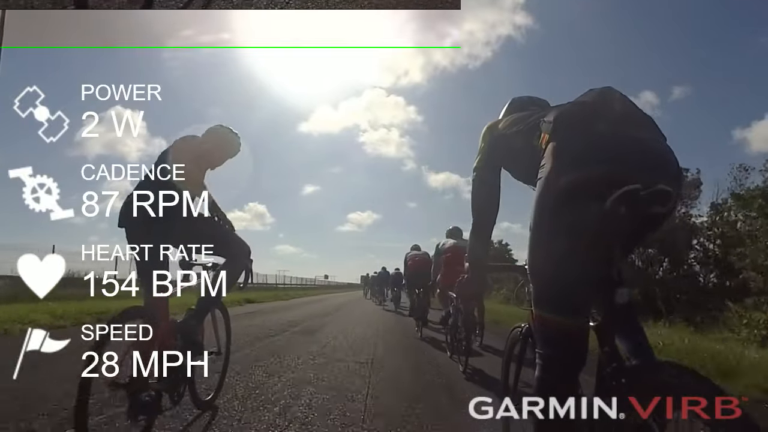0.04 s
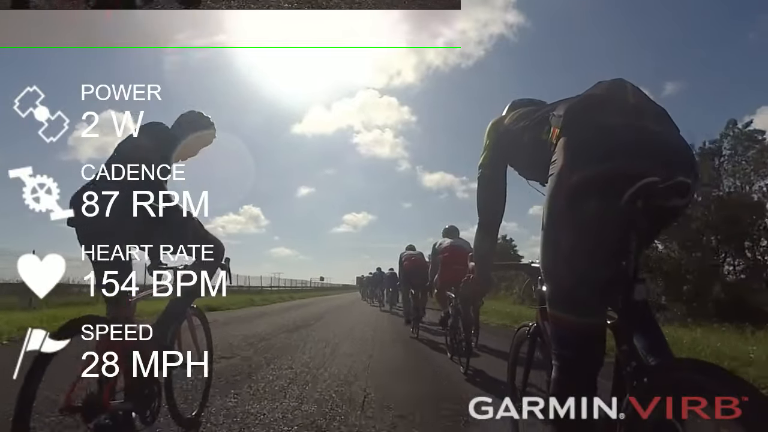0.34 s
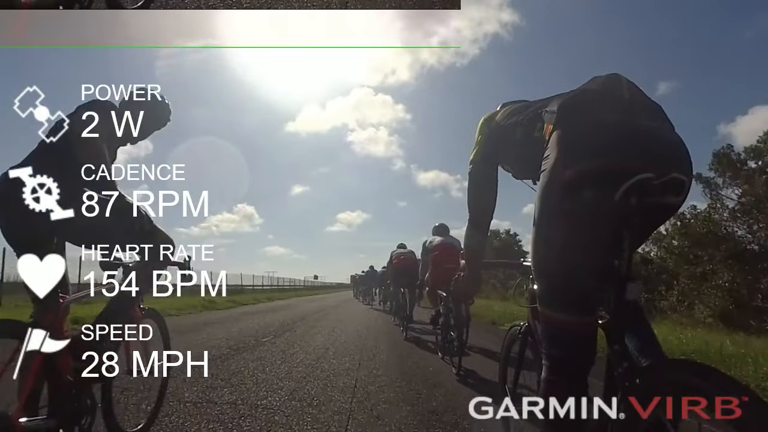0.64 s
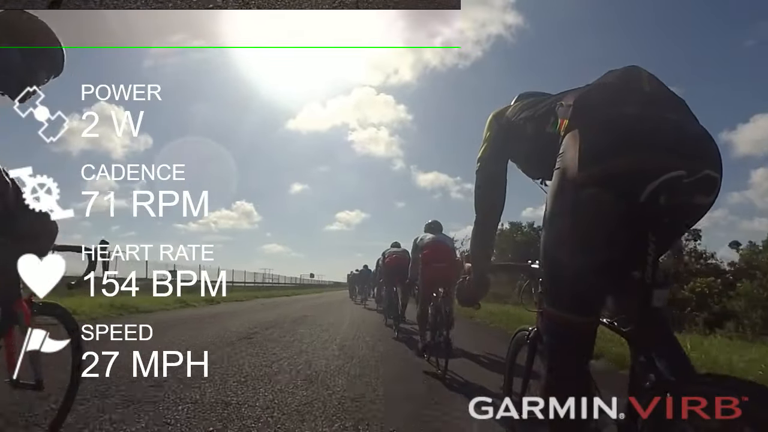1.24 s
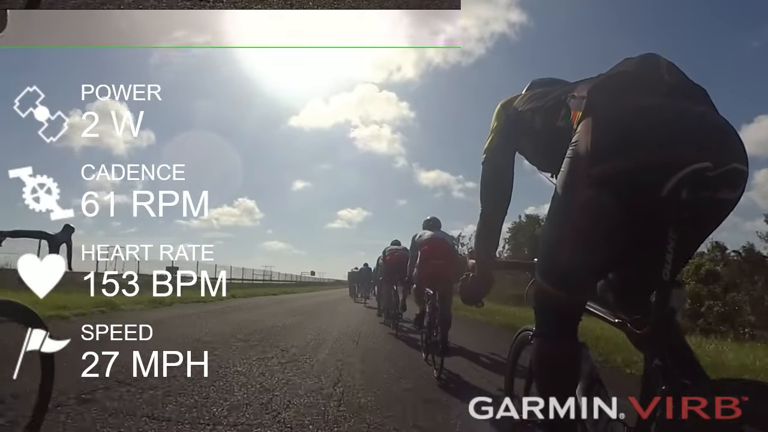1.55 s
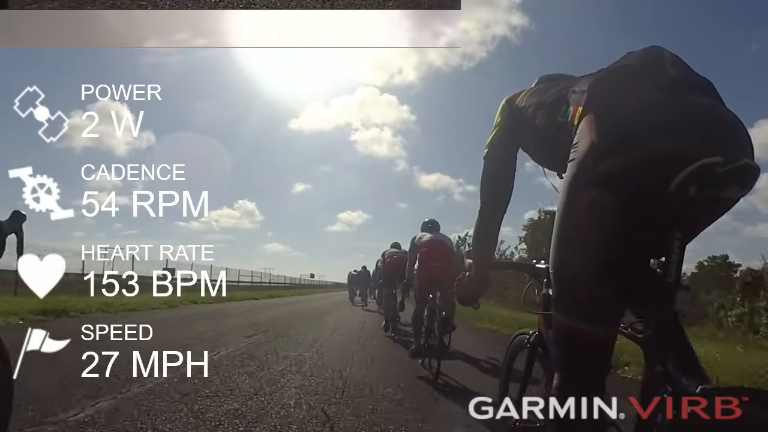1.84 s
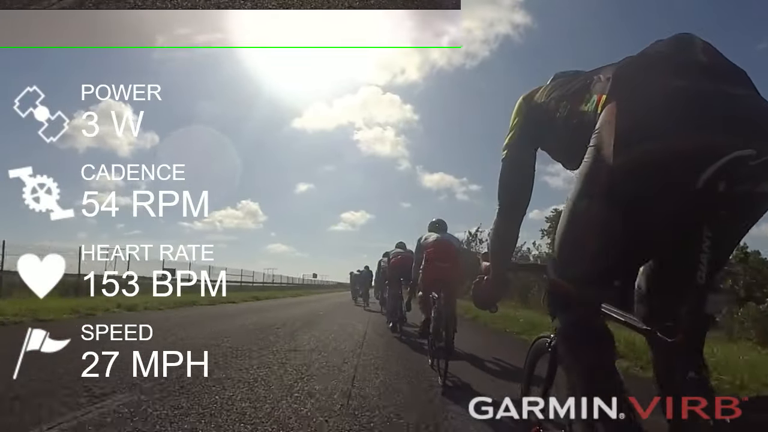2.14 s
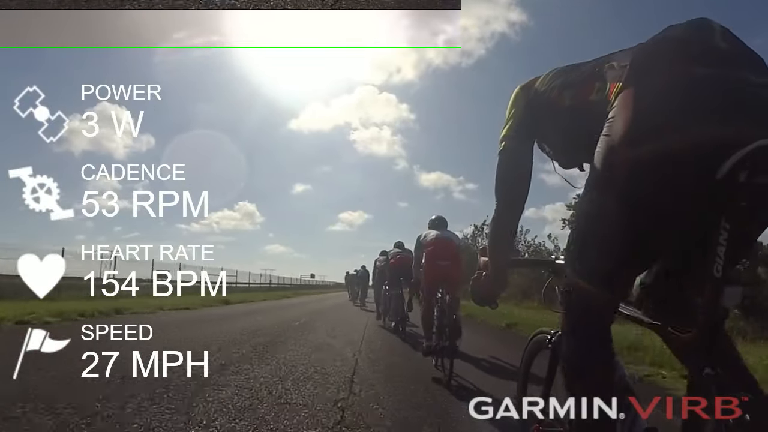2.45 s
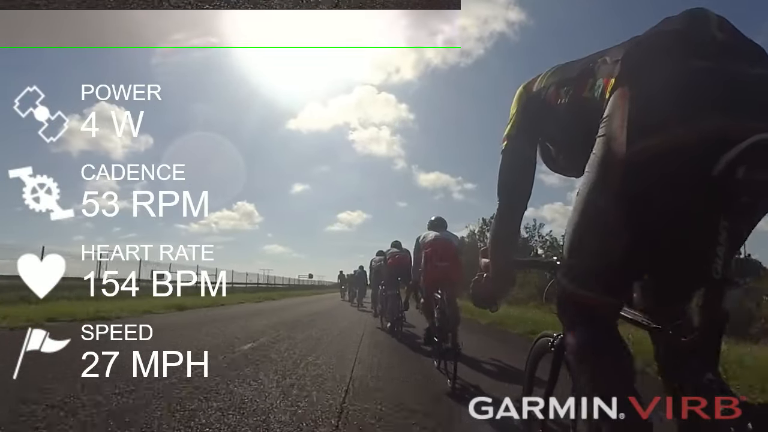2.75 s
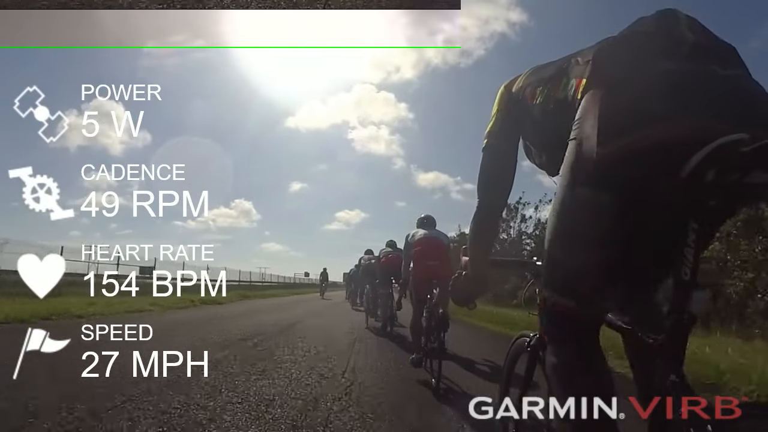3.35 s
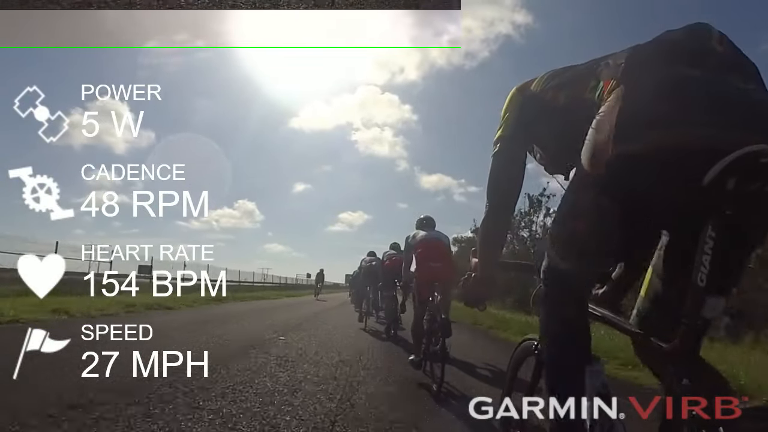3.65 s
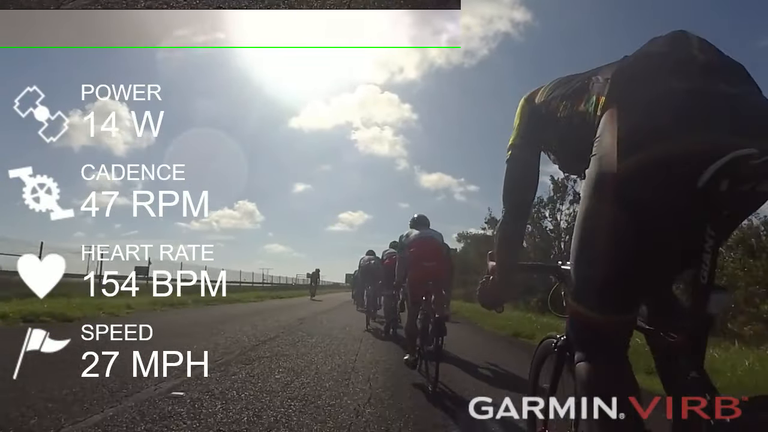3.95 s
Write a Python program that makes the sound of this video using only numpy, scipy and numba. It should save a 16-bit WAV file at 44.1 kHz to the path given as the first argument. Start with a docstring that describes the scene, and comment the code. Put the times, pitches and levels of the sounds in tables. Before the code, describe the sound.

Wind rumbles on the microphone over tyre noise from racing bicycles and a buzzing freewheel.

```python
"""A small camera in a case rides on a racing bicycle, in a fast bunch on coarse asphalt. From the start, wind
rumbles, road grit rings the case and the coasting freewheel buzzes. Gusts boom and thump on the case, bumps
knock the mount and light clicks rattle the case. Near 1.3 s the tyres hum. The freewheel slows to single ticks
and stops just after 2 s as the pedals catch up. Then the chain chatters in short spells, while the next rider's
tyres hiss closer and fade away."""
import sys
import numpy as np
from scipy import signal
from scipy.fft import rfft, irfft, next_fast_len
from scipy.io import wavfile
from scipy.ndimage import uniform_filter1d
from numba import njit

SR = 44100
rng = np.random.default_rng(int(sys.argv[2]) if len(sys.argv) > 2 else 0)


def to_wav(sig):
    """Store sig (one row per channel, or 1-D mono) as 16-bit WAV at the path in sys.argv[1].

    Samples outside -1..1 are clipped; the rate is SR.
    """
    pcm = np.clip(np.atleast_2d(sig), -1, 1) * 32767
    pcm = np.round(pcm).astype(np.int16)
    wavfile.write(sys.argv[1], SR, pcm.T)  # frames by channels


N = 176400
T = np.arange(N) / SR

# Levels in a table are relative: a function may turn its whole sound up or down.
# How loud the wind rumbles: time_s, level_db
WIND_LEVELS = [(0.0, -26), (0.08, -39.5), (0.1, -40.5), (0.22, -33), (0.24, -36.5), (0.51, -35.5),
               (0.54, -45), (0.63, -33.5), (0.67, -40.5), (0.76, -27), (0.78, -39.5), (0.89, -37),
               (0.91, -40.5), (1.06, -32), (1.48, -33.5), (1.49, -52), (1.53, -30.5), (1.7, -39.5),
               (1.8, -30.5), (1.87, -38), (1.93, -36), (2.51, -32), (2.53, -46), (2.56, -39), (2.6, -44),
               (2.66, -31), (2.86, -37), (2.88, -31), (3.25, -34), (3.36, -35), (3.42, -44.5),
               (3.44, -42.5), (3.48, -33.5), (3.77, -33), (3.79, -45), (3.83, -32.5), (4.0, -40.5)]
# Tone of the wind: pitch_hz, level_db
WIND_TONE = [(15, -31), (29, -21), (41, 1), (49, -0.5), (58, 2), (72, -7.5), (95, -8), (116, -3),
             (145, -24), (260, -38), (600, -80)]
# How loud the road and wind roar: time_s, level_db
ROAR_LEVELS = [(0.0, -43), (0.03, -45), (0.11, -56.5), (0.15, -48), (0.18, -51), (0.22, -55), (0.26, -62.5),
               (0.3, -49.5), (0.56, -59.5), (0.63, -53.5), (0.66, -58), (0.74, -47), (0.78, -57),
               (0.87, -50.5), (0.895, -66.5), (0.97, -51.5), (0.99, -56.5), (1.05, -48.5), (1.29, -50.5),
               (1.35, -46.5), (1.4, -49.5), (1.46, -47.5), (1.5, -58), (1.53, -48), (1.57, -58.5),
               (1.59, -50.5), (1.63, -59.5), (1.75, -49.5), (1.78, -44.5), (1.85, -53.5), (1.92, -44),
               (1.93, -46.5), (2.03, -52), (2.15, -46), (2.21, -52), (2.31, -46.5), (2.54, -49),
               (2.56, -39), (2.58, -56.5), (2.65, -45), (2.75, -50.5), (2.88, -44), (2.97, -49.5),
               (3.24, -44), (3.38, -57.5), (3.405, -48), (3.43, -57.5), (3.46, -50.5), (3.64, -45.5),
               (3.66, -53.5), (3.81, -50), (3.83, -45), (3.85, -55.5), (4.0, -53.5)]
# Tone of the roar: pitch_hz, level_db
ROAR_TONE = [(90, -18.5), (160, 3.5), (212, 6.5), (262, -11.5), (322, 3.5), (395, -9), (505, 0.5),
             (620, -4), (740, -13), (900, -13), (1020, -22), (1150, -17.5), (1280, -23), (1500, -20.5),
             (1850, -24), (2100, -33.5), (2900, -39.5), (3800, -39.5), (4750, -52.5), (5600, -60.5),
             (7200, -84), (8000, -52), (10500, -64.5)]
# How fast the freewheel ticks: time_s, ticks_per_s
TICK_RATES = [(0, 170), (1.0, 139), (1.42, 164), (1.57, 145), (1.7, 102), (1.89, 74), (1.99, 56),
              (2.08, 49), (2.09, 28), (2.115, 26)]
# How loud the freewheel is: time_s, level_db
TICK_LEVELS = [(0, -60), (.07, -68), (.085, -74.5), (.18, -70), (.25, -79.5), (.43, -71.5), (.54, -82),
               (.62, -73.5), (.87, -70.5), (.91, -84), (1.05, -67.5), (1.46, -68), (1.5, -74.5),
               (1.65, -78.5), (1.76, -68), (1.84, -75), (1.91, -68), (2.01, -76), (2.06, -67.5),
               (2.13, -72), (2.15, -110)]
# Tone of the wheel hub: pitch_hz, level_db
HUB_TONE = [(1200, -5.5), (2000, 1.5), (3000, -2.5), (3500, 13), (3850, 18.5), (4400, 1.5), (5100, 0.5),
            (5650, -2.5), (6400, -8.5), (7200, -14.5), (7950, 3.5), (8700, -1.5), (9800, -10), (11200, -21),
            (14000, -19.5)]
# Gusts that make the case boom: middle_s, level_db
BOOM_GUSTS = [(0.055, -48), (0.87, -51.5), (1.07, -41.5), (1.93, -42), (2.32, -43), (2.448, -43.5)]
# Low notes of the case: pitch_hz, width_hz, level_db
BOOM_NOTES = [(195, 52, -1), (318, 97, -6)]
# Slaps of wind on the case: time_s, thump_db, crunch_db
WIND_SLAPS = [(0.07, -13, -39), (0.149, -18, -47), (0.222, -18, -40.5), (0.379, -18.5, -42.5),
              (0.446, -21.5, -43), (0.505, -21, -44.5), (0.641, -15, -41), (0.828, -19.5, -43.5),
              (0.879, -16, -39), (1.269, -17, -44), (1.462, -22.5, -40.5), (1.53, -23, -47),
              (1.596, -21, -48), (1.778, -22, -49), (1.918, -17, -57), (1.981, -17.5, -39),
              (2.061, -24.5, -41), (2.153, -25, -49), (2.194, -20.5, -40.5), (2.326, -22, -42.5),
              (2.555, -14.5, -52.5), (2.877, -26.5, -39), (3.254, -16.5, -38.5), (3.411, -16.5, -45.5),
              (3.833, -13.5, -42), (3.975, -23.5, -46.5)]
# Tone of a slap's crunch: pitch_hz, level_db
CRUNCH_TONE = [(150, 8.5), (500, 5.5), (900, -5), (1750, -23), (2300, -25.5), (3300, -30), (3850, -11.5),
               (4500, -30.5), (6800, -50.5), (8200, -40), (10000, -56)]
# Hard bumps in the road: start_s, level_db
ROAD_BUMPS = [(0.073, -47.5), (0.6406, -44), (0.8815, -50), (2.558, -58.5)]
# Notes of the knocked mount: pitch_hz, level_db, ring_s (time to fade by 60 dB)
MOUNT_NOTES = [(1624, -2.5, 0.017), (2600, -15.5, 0.014), (4000, -15, 0.019)]
# Light clicks and taps that rattle the case: start_s, level_db
RATTLE_CLICKS = [(0.0745, -55), (0.1512, -53.5), (0.5126, -59), (0.522, -63), (0.882, -55), (1.6015, -60),
                 (1.6108, -57.5), (1.9817, -63), (3.035, -59), (3.5379, -58.5), (3.685, -57), (3.734, -57),
                 (3.7554, -55.5), (3.867, -76), (3.9075, -66.5), (3.9205, -59.5), (3.9334, -66), (3.963, -63),
                 (3.9914, -66)]
# Tone of a tap's scuff: pitch_hz, level_db
SCUFF_TONE = [(300, -10), (1500, 1), (2600, -6), (4000, 0), (5200, -7), (6500, -22)]
# Swells of tyre hum: middle_s, length_s, level_db
TYRE_SWELLS = [(1.3, 0.3, -55.5), (2.351, 0.36, -58.5), (3.214, 0.077, -45)]
# Spells of chain chatter: middle_s, length_s, level_db
CHATTER_SPELLS = [(2.286, 0.055, -68), (2.379, 0.044, -71), (2.89, 0.031, -68), (3.244, 0.032, -71),
                  (3.547, 0.033, -67.5), (3.61, .08, -74.5)]
# Tone of the chain: pitch_hz, level_db
CHAIN_TONE = [(2000, -21), (3400, 0), (4250, 4), (4800, -6.5), (5500, -19.5), (7000, -35)]


def from_db(db):
    """Turn decibels into a number to multiply by."""
    return 10 ** (np.asarray(db) / 20)


def normalise(x):
    """Scale a sound to an average power of 1."""
    return x / np.sqrt(np.mean(x ** 2))


def gain_curve(rows):
    """Gain that slides between (time_s, level_db) rows."""
    return from_db(np.interp(T, *np.array(rows).T))


def swell(middle_s, length_s, level_db, steepness=2):
    """A smooth rise and fall; more steepness gives a flatter top."""
    return from_db(level_db) * np.exp(-(2 * (T - middle_s) / length_s) ** steepness)


def flutter(rate_hz, depth_db):
    """Gain that wavers smoothly at random."""
    hold = int(SR / rate_hz)
    steps = np.repeat(rng.standard_normal(N // hold + 1), hold)
    return from_db(depth_db * normalise(uniform_filter1d(steps, hold)[:N]))


def shape_tone(x, rows):
    """Filter a sound along a curve of (pitch_hz, level_db) rows."""
    size = next_fast_len(N + SR // 2)
    hz, db = np.array(rows).T
    bins_hz = np.maximum(np.arange(size // 2 + 1) * SR / size, 1)
    rolloff = np.minimum(1, hz[-1] / bins_hz) ** 2
    gains = rolloff * from_db(np.interp(np.log(bins_hz), np.log(hz), db))
    # fold the filter so it rings after each click, never before
    cepstrum = irfft(np.log(gains), size)
    cepstrum[1:size // 2] *= 2
    cepstrum[size // 2 + 1:] = 0
    return irfft(rfft(x, size) * np.exp(rfft(cepstrum)), size)[:N]


def ringing_noise(pitch_hz, width_hz):
    """Noise ringing around one pitch."""
    band = signal.iirpeak(pitch_hz, pitch_hz / width_hz, fs=SR)
    once = signal.lfilter(*band, rng.standard_normal(N))
    return normalise(signal.lfilter(*band, once))


def wind_pressure(even_s=0.13):
    """Swirling air pushes on the case in low swings of fairly even strength."""
    swings = shape_tone(rng.standard_normal(N), WIND_TONE)
    power = uniform_filter1d(swings ** 2, int(even_s * SR))
    return normalise(swings / np.sqrt(power + 1e-12))


def grit(clicks_per_s=1500, spread_db=1.5, click_share=0.31):
    """Dense, uneven clicks in a smooth rush, as when stones meet tyres."""
    clicks = (rng.random(N) < clicks_per_s / SR) * rng.standard_normal(N)
    clicks *= from_db(spread_db * np.minimum(rng.exponential(size=N), 4))
    return np.sqrt(click_share) * normalise(clicks) + np.sqrt(1 - click_share) * rng.standard_normal(N)


def case_ring(shaking, pitch_hz=3806, width_hz=150, top_hz=4600):
    """The shaken case rings at its main note."""
    pole = np.exp((2j * pitch_hz - width_hz) * np.pi / SR)
    softened = signal.sosfilt(signal.butter(2, top_hz, fs=SR, output="sos"), shaking)
    return signal.lfilter([1], [1, -pole], softened).imag


def road_roar(pressure, swirl_depth=0.095, roar_db=4, ring_db=-24):
    """Road and wind roar through frame and case, swelling with each swirl of air."""
    shaking = grit() * normalise(1 + swirl_depth * pressure ** 2) * flutter(rate_hz=45, depth_db=1.2)
    ring = normalise(case_ring(shaking) * flutter(rate_hz=110, depth_db=2))
    roar = normalise(shape_tone(shaking, ROAR_TONE))
    return (from_db(roar_db) * roar + from_db(ring_db) * ring) * gain_curve(ROAR_LEVELS)


def freewheel(burst_s=0.0032, scatter_db=2.5, steady_hiss=0.1, gain_db=-2.5):
    """A small catch snaps over each tooth and leaves a short burst ringing in the hub."""
    rate = np.interp(T, *np.array(TICK_RATES).T)
    teeth = np.cumsum(rate) / SR
    teeth -= np.interp(TICK_RATES[-1][0], T, teeth) % 1  # a tick lands at the end of the slowdown
    strength = from_db(scatter_db * rng.standard_normal(size=1000))[teeth.astype(int)]
    age = (teeth % 1) / rate / burst_s
    snaps = strength * age * np.exp(-.5 * age ** 2) + steady_hiss
    hub = normalise(shape_tone(rng.standard_normal(N) * snaps, HUB_TONE))
    return hub * gain_curve(TICK_LEVELS) * from_db(gain_db)


def case_booms(length_s=0.083):
    """Some gusts set the low notes of the case booming for a moment."""
    gusts = sum(swell(middle_s, length_s, db) for middle_s, db in BOOM_GUSTS)
    return gusts * sum(from_db(db) * ringing_noise(hz, width_hz) for hz, width_hz, db in BOOM_NOTES)


def wind_slaps(thump_hz=73.7, thump_s=0.004, rise_s=0.0054, fall_s=0.002):
    """Each slap of wind is one swing of pressure with a short crunch at its height."""
    thumps, bursts = np.zeros(N), np.zeros(N)
    for time_s, thump_db, crunch_db in WIND_SLAPS:
        age = T - time_s - 0.0037  # thump and crunch centre just after the listed time
        swing = np.sin(2 * np.pi * thump_hz * age) * np.exp(-.5 * (age / thump_s) ** 2)
        thumps -= from_db(thump_db - 4) * swing
        age = T - time_s - 0.0036
        bursts += from_db(crunch_db + 2.5) * np.exp(np.minimum(age / rise_s, -age / fall_s))
    return thumps + bursts * normalise(shape_tone(grit(), CRUNCH_TONE))


def mount_knocks():
    """Hard bumps knock the mount, which rings briefly."""
    knocks = np.zeros(N)
    for start_s, bump_db in ROAD_BUMPS:
        age = np.maximum(T - start_s, 0)
        for hz, note_db, ring_s in MOUNT_NOTES:
            fade = np.exp(-np.log(1000) * age / ring_s)
            knocks += from_db(bump_db + note_db) * np.sin(2 * np.pi * hz * age) * fade
    return knocks


def rattles(scuff_s=0.0012, ring_db=4, scuff_db=15):
    """Light clicks rattle the case: a short scuff, then the case rings."""
    taps = np.zeros(N)
    for start_s, db in RATTLE_CLICKS:
        taps[int(start_s * SR)] += from_db(db)
    contact = np.exp(-T[:SR // 50] / scuff_s)
    scuffs = np.convolve(taps, contact / np.linalg.norm(contact))[:N] * rng.standard_normal(N)
    return from_db(ring_db) * case_ring(taps) + from_db(scuff_db) * shape_tone(scuffs, SCUFF_TONE)


def tyre_hum():
    """A hollow hum of the tyres swells out of the roar now and then."""
    return sum(swell(*row) for row in TYRE_SWELLS) * ringing_noise(pitch_hz=526, width_hz=80)


def nearby_tyres():
    """The next bicycle's tyres hiss over the asphalt as it drifts near."""
    nearness = swell(middle_s=2.88, length_s=1.3, level_db=-68)
    return nearness * ringing_noise(pitch_hz=1290, width_hz=670)


def chain_chatter():
    """The chain chatters in short spells once the rider pedals again."""
    spells = sum(swell(*row, steepness=4) for row in CHATTER_SPELLS)
    chatter = shape_tone(grit(), CHAIN_TONE) * flutter(rate_hz=90, depth_db=4.5)
    return spells * normalise(chatter)


def scene():
    """Everything that reaches the camera's microphone, in one channel."""
    pressure = wind_pressure()
    wind = pressure * gain_curve(WIND_LEVELS) * from_db(-0.15)
    mix = wind + road_roar(pressure) + freewheel()
    mix += case_booms() + wind_slaps() + mount_knocks() + rattles()
    mix += tyre_hum() + nearby_tyres() + chain_chatter()
    return mix[None]


@njit
def follow_peaks(x, decay):
    """Jump up to each peak at once, then sink slowly."""
    peaks, held = np.empty(len(x)), 0.
    for i in range(len(x)):
        held = max(x[i], held * decay)
        peaks[i] = held
    return peaks


def record(dry, limit_db=-19.8, release_s=0.08, top_hz=14750):
    """The camera turns itself down briefly after loud peaks and cuts the highest treble."""
    peaks = follow_peaks(np.abs(dry[0]), np.exp(-1 / (release_s * SR)))
    gain = np.minimum(1, from_db(limit_db) / (peaks + 1e-9))
    smooth_gain = uniform_filter1d(gain, size=128)
    treble_cut = signal.ellip(8, .2, 70, top_hz, fs=SR, output="sos")
    return signal.sosfilt(treble_cut, dry * smooth_gain)


dry = scene()
out = record(dry)
to_wav(out)
```